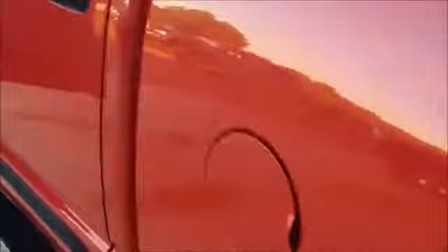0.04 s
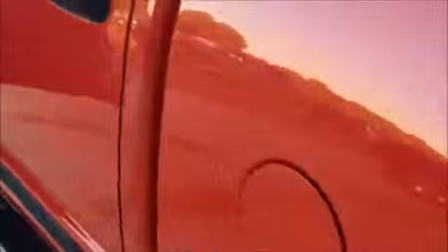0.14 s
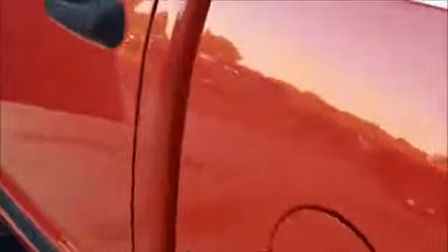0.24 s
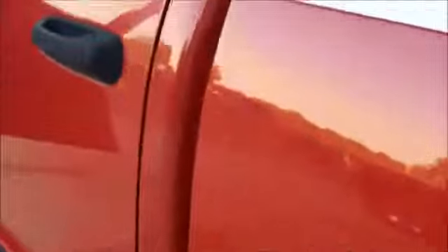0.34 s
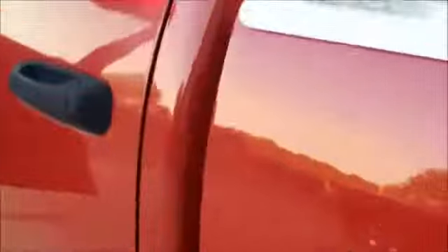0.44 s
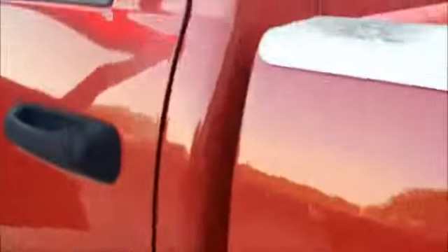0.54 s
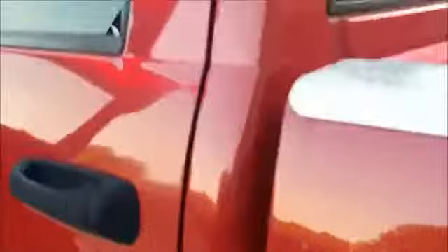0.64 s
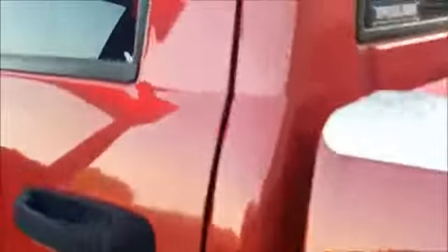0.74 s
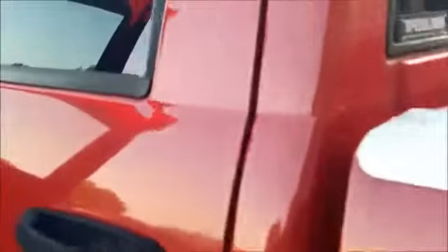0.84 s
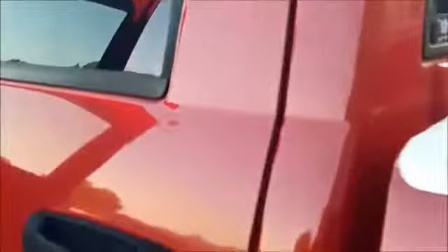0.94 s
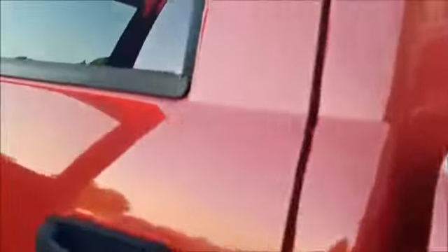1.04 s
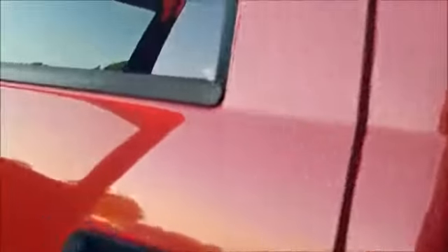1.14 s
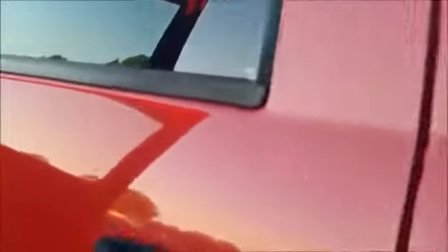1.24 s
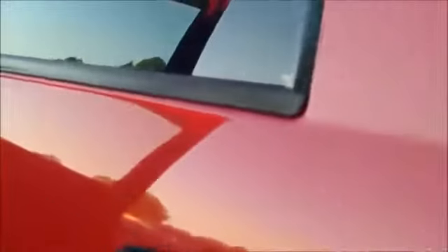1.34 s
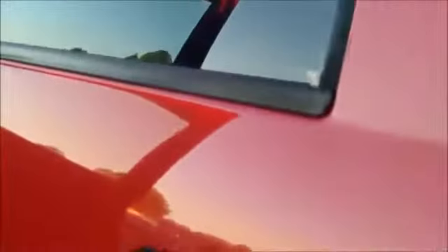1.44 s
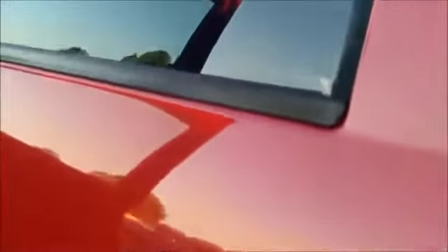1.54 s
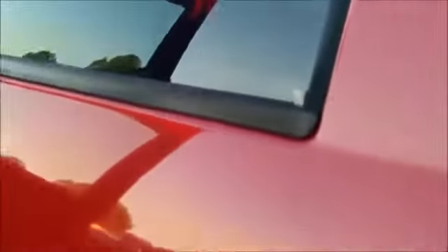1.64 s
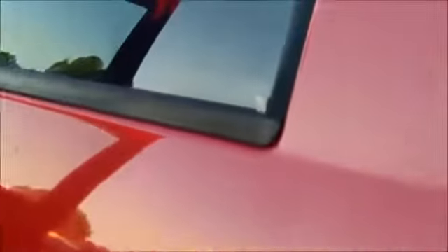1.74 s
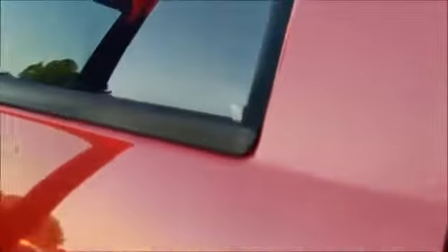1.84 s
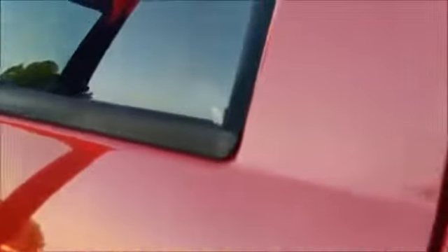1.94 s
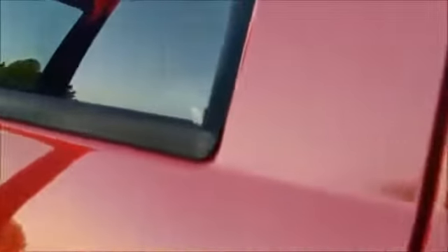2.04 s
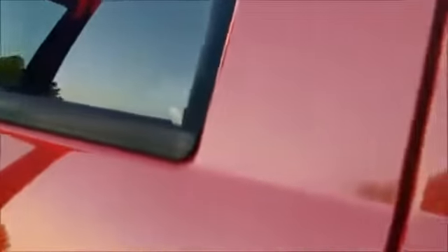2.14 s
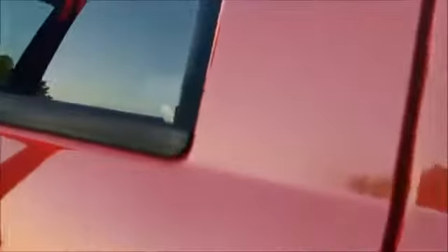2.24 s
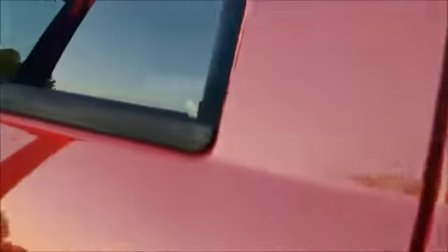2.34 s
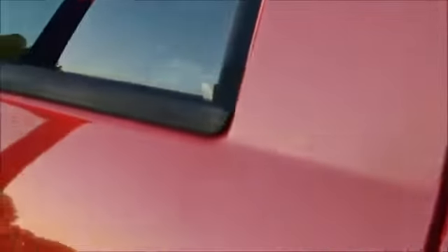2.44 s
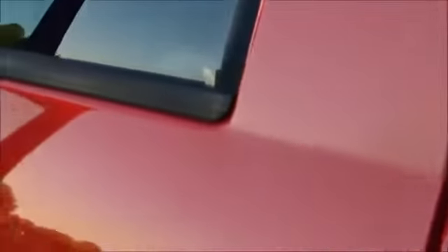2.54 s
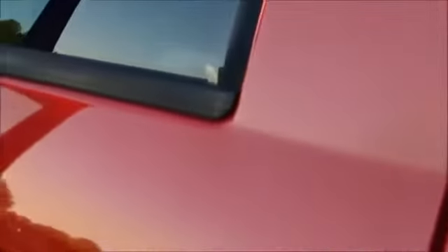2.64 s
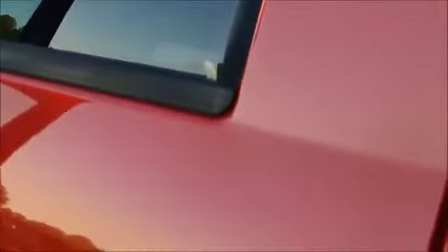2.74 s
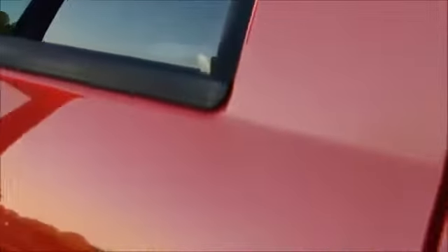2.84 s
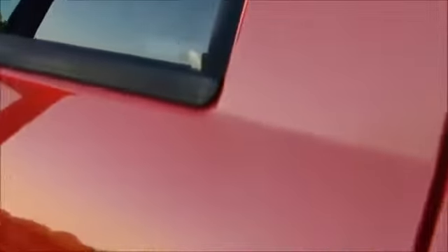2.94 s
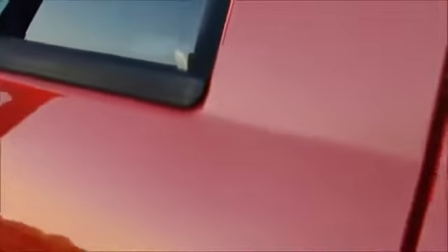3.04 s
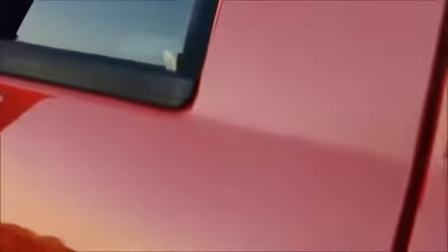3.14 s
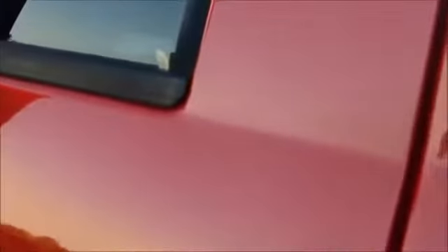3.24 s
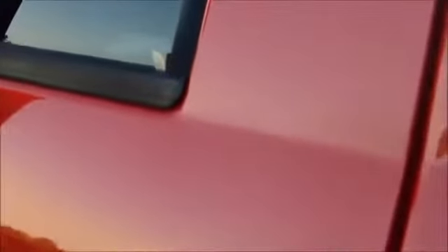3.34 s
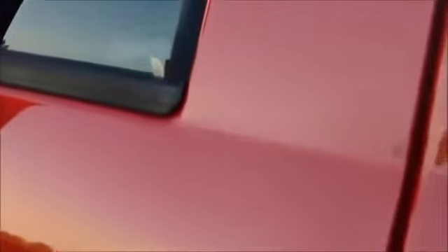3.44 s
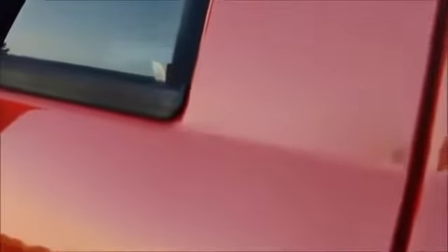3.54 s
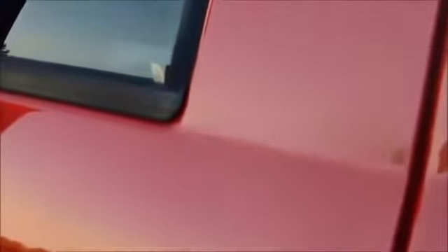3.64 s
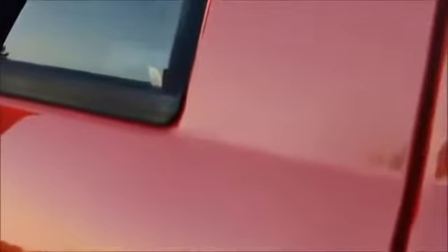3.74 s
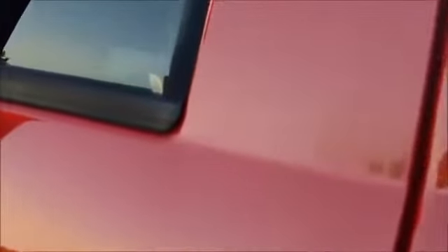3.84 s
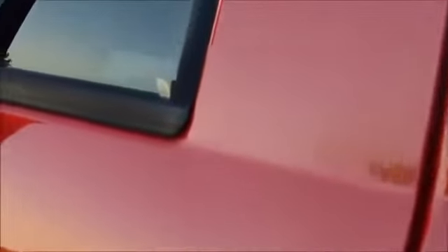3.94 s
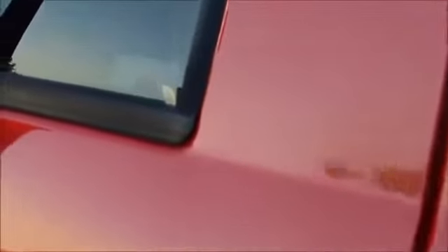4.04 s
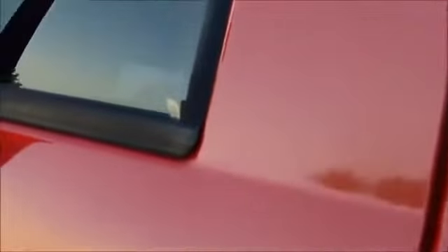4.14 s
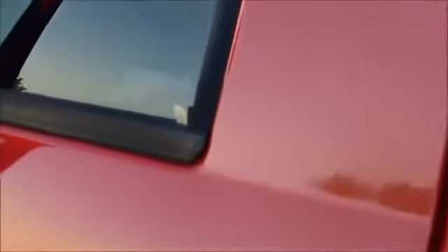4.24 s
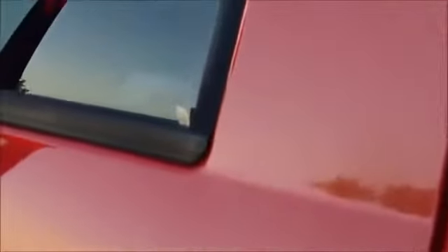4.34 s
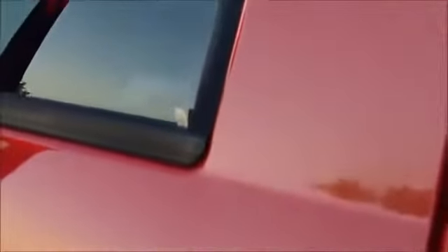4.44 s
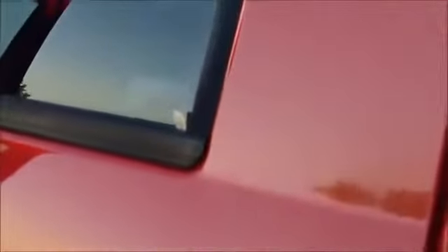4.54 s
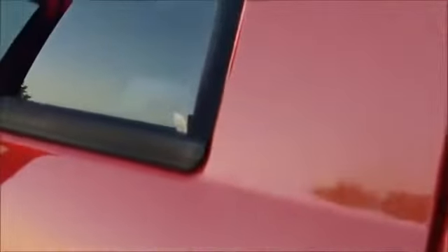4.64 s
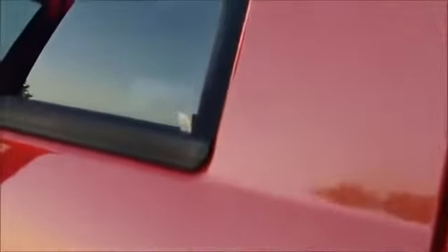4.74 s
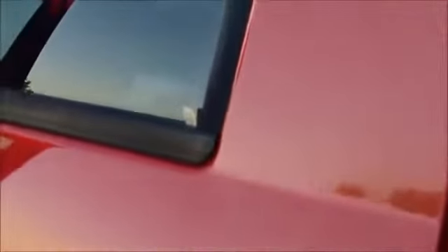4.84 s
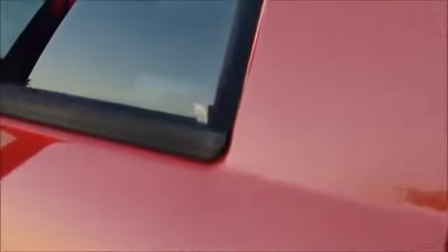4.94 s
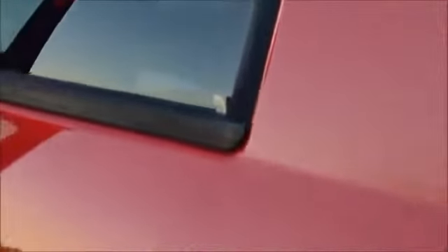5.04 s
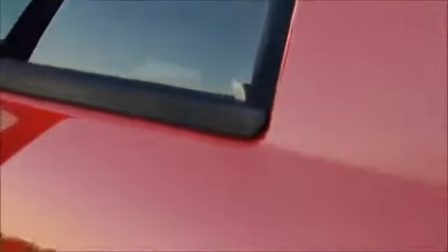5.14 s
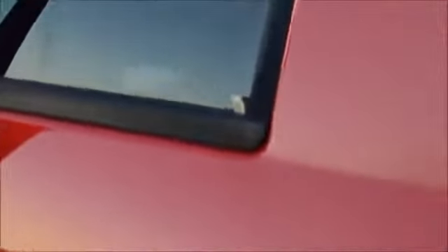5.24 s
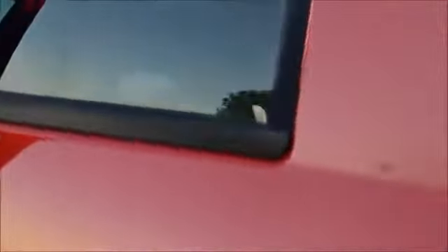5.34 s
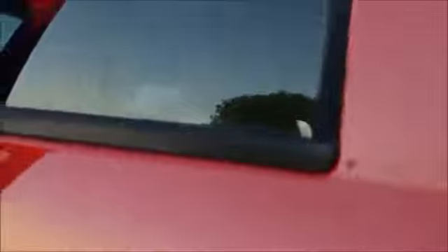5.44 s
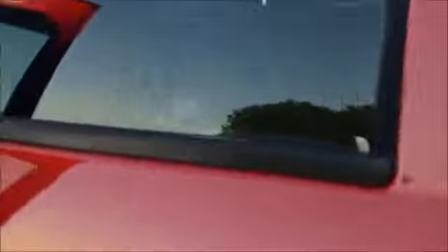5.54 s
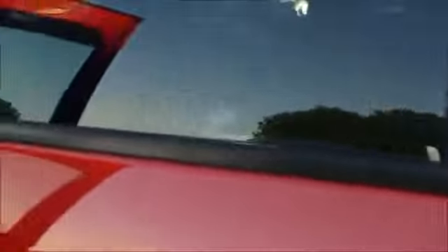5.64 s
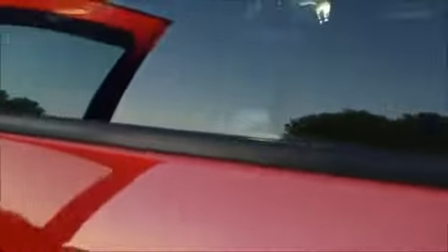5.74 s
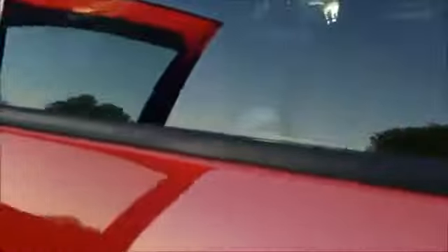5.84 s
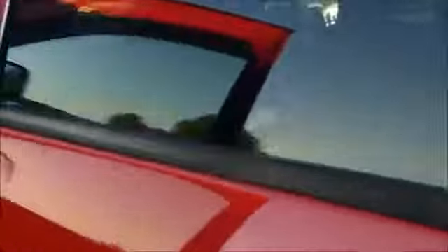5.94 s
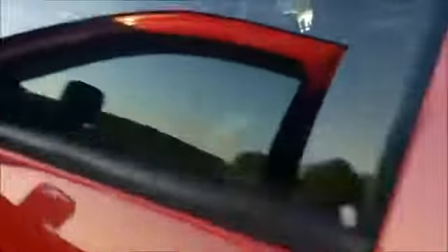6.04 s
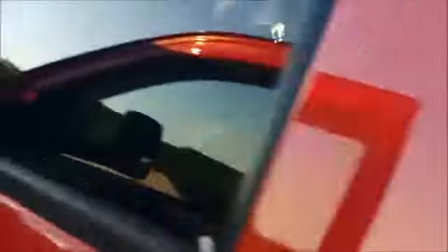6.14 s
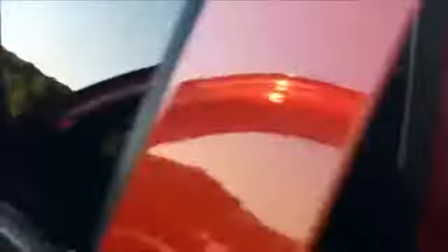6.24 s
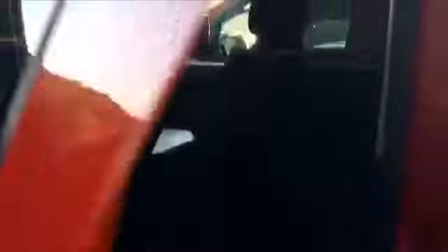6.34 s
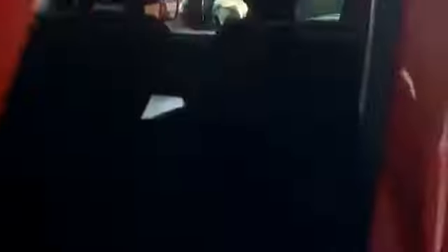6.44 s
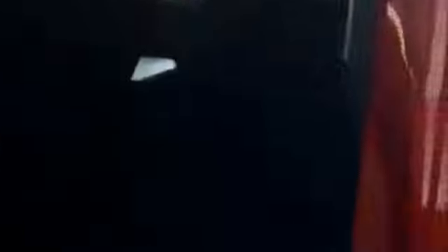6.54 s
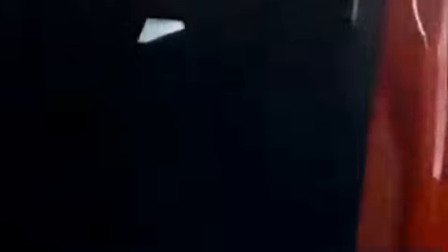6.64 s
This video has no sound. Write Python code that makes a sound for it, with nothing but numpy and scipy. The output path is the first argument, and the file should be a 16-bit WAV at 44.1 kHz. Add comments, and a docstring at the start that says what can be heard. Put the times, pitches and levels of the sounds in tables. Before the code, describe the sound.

Fingers and fabric scrape and click against a small hard case outdoors; later a handle creaks, a door pops, and a second latch cracks loudly.

```python
"""Beside a parked pickup truck on a still evening, a far traffic drone (filtered noise) hums throughout. First
cloth and fingers rub, tick and squeak close to the microphone: hiss with tiny clicks, short bursts ringing in a
hard case, and unsteady tones. Then a handle creaks, again with unsteady tones, the front door pops off its
latch while the hand jolts the case, and swings with rumbling, scuffing noise and a short rattle, and the rear
cab door unlatches with a sharp clack: a push, a noisy crack, ringing steel and the cab's echo."""
import sys
import numpy as np
from scipy import signal
from scipy.fft import rfft, irfft, next_fast_len
from scipy.io import wavfile

SR = 44100
rng = np.random.default_rng(int(sys.argv[2]) if len(sys.argv) > 2 else 0)


def persist_wave(psi):
    """Save psi, clipped to +-1, as 16-bit WAV."""
    counts = np.round(np.clip(psi, -1, 1) * 32767).astype(np.int16)
    wavfile.write(sys.argv[1], SR, np.atleast_2d(counts).T)


N = 295196
TIME = np.arange(N) / SR  # seconds


def from_db(db):
    """Turn decibels into a gain."""
    return 10 ** (np.asarray(db) / 20)


def rms_one(x):
    """Scale a sound so that its average strength (rms) is 1."""
    return x / np.sqrt(np.mean(x ** 2) + 1e-20)


def gains(rows):
    """Draw one gain curve over time for each dB column, practically silent outside the rows."""
    s, *columns = np.transpose(rows)
    return [from_db(np.interp(TIME, s, column, left=-120, right=-120)) for column in columns]


def cut(x, hz, kind, order=2):
    """Filter smoothly: "low" keeps what lies below hz, "high" keeps what lies above."""
    safe_hz = np.clip(hz, 10, .45 * SR)
    return signal.sosfilt(signal.butter(order, safe_hz, kind, fs=SR, output="sos"), x)


def colour(x, spectrum):
    """Shape the tone of x by gains at given frequencies, then scale it to rms 1."""
    hz, db = np.transpose(spectrum)
    size = next_fast_len(N)
    bins = np.maximum(np.fft.rfftfreq(size, 1 / SR), 1)
    bin_db = np.interp(np.log(bins), np.log(hz), db, left=-90, right=-90)
    return rms_one(irfft(rfft(x, size) * from_db(bin_db), size)[:N])


def drift(rate_hz, size=N):
    """Wander at random between rate_hz new values a second, with rms 1."""
    steps = np.arange(size) * rate_hz / SR
    count = int(steps[-1]) + 2
    return rms_one(np.interp(steps, np.arange(count), rng.standard_normal(count)))


def resonate(x, hz, width_hz):
    """Let x ring at one frequency, with a gain of about 1 at the peak."""
    r = np.exp(-np.pi * width_hz / SR)
    feedback = [1, -2 * r * np.cos(2 * np.pi * hz / SR), r * r]
    return signal.lfilter(np.array([1, 0, -1]) * (1 - r * r) / 2, feedback, x)


def add(out, s, sound):
    """Mix a short sound in at time s."""
    at = max(round(s * SR), 0)
    out[at:at + len(sound)] += sound[:max(N - at, 0)]


def burst(decay_s, count=2048):
    """A contact makes tiny random slips that die away quickly."""
    return rng.standard_normal(count) * np.exp(-np.arange(count) / (SR * decay_s))


def at_level(sound, db):
    """Give a short sound the energy of one millisecond at an rms level of db."""
    return sound * from_db(db) / np.sqrt(np.sum(sound ** 2) / (SR / 1000))


def friction(per_s, spread_db, smooth):
    """Rough surfaces catch and let go: random clicks of uneven size over a smooth hiss."""
    sizes = from_db(spread_db * np.minimum(rng.exponential(1, N), 4)) * rng.choice([-1, 1], N)
    clicks = sizes * (rng.random(N) < per_s / SR)
    return rms_one(clicks) + smooth * rng.standard_normal(N)


def patchy(x, depth_db, rate_hz, count=16):
    """The contact keeps changing, so bands of the sound swell and fade each on its own."""
    centres = np.geomspace(300, 12000, count)
    # each band adds only its change from its normal strength
    bands = [resonate(x, hz, hz / 5) * (from_db(depth_db * drift(rate_hz)) - 1) for hz in centres]
    return rms_one(x + np.sum(bands, axis=0))


def shell(x):
    """A small hard case rings at several frequencies side by side."""
    # ringing of the case: [f/Hz, width/Hz, level/dB]
    shell_modes = [(1204, 226, 7), (2400, 450, 5), (2860, 960, 0.5), (4420, 990, 3.5), (5070, 1170, -1.5),
                   (6930, 960, -2), (8940, 1180, -5), (14040, 830, -30)]
    # neighbouring modes have opposite signs
    return sum((-1) ** k * from_db(db) * resonate(x, hz, width)
               for k, (hz, width, db) in enumerate(shell_modes))


def gesture(s, swell_s, hold_s, fade_db_per_s):
    """A movement swells evenly, holds and dies away."""
    swell = np.clip((TIME - s) / max(swell_s, 1 / SR), 0, 1)
    fading_s = np.maximum(TIME - s - swell_s - hold_s, 0)
    return swell * from_db(-np.minimum(fade_db_per_s * fading_s, 200))


def together(envelopes):
    """Overlapping movements add in power."""
    return np.sqrt(sum(e ** 2 for e in envelopes))


def two_layers(rows, fade_db_per_s):
    """Each row drives two layers at their own levels; its length sets its fade through fade_db_per_s."""
    moves = []
    for s, swell_s, hold_s, *dbs in rows:
        shape = gesture(s, swell_s, hold_s, fade_db_per_s(swell_s + hold_s))
        moves.append((shape, from_db(dbs)))
    return [together(shape * gain[k] for shape, gain in moves) for k in range(2)]


def outdoors(air_db=-50, hum_db=-57):
    """Still air is soft shaped noise; far traffic adds a low drone, noise ringing near 136 Hz."""
    # tone of the distant outdoor hum: [f/Hz, relative level/dB]
    air_spectrum = [(12, -21), (20, -0.5), (80, -5), (144, -3), (180, -11.5), (382, -11), (416, -11),
                    (452, -11.5), (788, -15), (1300, -21), (1580, -24.5), (4430, -28.5), (8170, -32.5),
                    (14300, -34.5), (15500, -42)]
    # slow rise and fall of air and drone: [t/s, level/dB]
    air_swell = [(0, 2.5), (1, 3.5), (2, 3), (3.5, 2), (4.6, 1.5), (6.69, 3)]
    swell, = gains(air_swell)
    drone = rms_one(resonate(rng.standard_normal(N), 135.6, 30))
    air = colour(rng.standard_normal(N), air_spectrum)
    return swell * (from_db(air_db) * air + from_db(hum_db) * drone)


def sliding(fade_db_per_s=229):
    """How hard the cloth slides at each moment, as a gain for its hiss."""
    # strokes of cloth past the case: [start t/s, swell/s, hold/s, hiss level/dB]
    strokes = [(0.0, 0.03, 0.1, -58), (0.444, 0.0054, 0.044, -46), (0.615, 0.055, 0.022, -50.5),
               (1.086, 0.0054, 0.021, -37), (1.094, .17, 0.15, -30.5), (1.475, 0.035, 0.17, -49.5),
               (1.686, 0.014, 0.044, -38), (1.74, 0.015, 0.031, -46.5), (2.1, 0.037, 0.079, -47.5),
               (2.205, 0.031, 0.012, -31), (2.254, 0.083, 0.21, -32.5), (2.576, 0.016, 0.22, -44.5),
               (2.753, .06, 0.033, -31.5), (2.882, 0.092, 0.12, -42.5), (3.107, 0.018, 0.16, -49),
               (3.326, 0.045, 0.042, -51.5), (3.776, 0.088, 0.19, -47), (4.195, 0.066, 0.089, -54.5)]
    return together(from_db(db) * gesture(s, swell_s, hold_s, fade_db_per_s)
                    for s, swell_s, hold_s, db in strokes)


def rubbing(hiss, flutter_db=1.9, catch_db=-9, fade_db=9.5):
    """Cloth hisses and catches, the case rumbles; a pressing, shifting hand makes low thumps."""
    # the hand presses and shifts on the case; at the last two rows it jolts the case as the doors open: #
    # [start t/s, swell/s, hold/s, rumble level/dB, low thump level/dB]
    pushes = [(0.007, 0.0017, .005, -41, -60), (0.444, 0.0031, 0.046, -39.5, -46),
              (1.088, 0.0057, 0.027, -37.5, -39.5), (1.2, 0.042, .01, -37, -49),
              (1.35, 0.021, 0.089, -29.5, -53), (1.685, 0.0026, 0.01, -30.5, -48),
              (2.342, .006, .01, -29, -44), (2.36, .025, 0.052, -30, -26.5),
              (2.55, 0.057, 0.075, -49.5, -45), (2.81, 0.02, 0.023, -40, -55),
              (2.95, 0.045, 0.073, -47.5, -60), (5.89, .01, 0.084, -41, -31.5),
              (6.266, .008, 0.042, -57, -37)]
    # tone of the cloth fibres: [f/Hz, relative level/dB]
    cloth_spectrum = [(290, -21), (500, -45), (628, -10.5), (1080, 2.5), (1300, -22), (1430, -9.5),
                      (1830, -2), (2230, 2.5), (3720, 3), (7470, -6.5), (8130, -3), (9380, -8.5),
                      (15000, -23)]
    # tone of the rumble: [f/Hz, relative level/dB]
    rumble_spectrum = [(70, -10), (120, -4.5), (170, -0.5), (270, 0), (330, 1), (460, -2), (700, -6.5),
                       (900, -6.5), (1200, -10), (1700, -14), (2600, -22)]
    # tone of the low thumps: [f/Hz, relative level/dB]
    thump_spectrum = [(25, -15), (55, 2), (85, -7.5), (118, 8), (170, -6), (260, -3), (380, -10),
                      (520, -27), (800, -29)]
    # fade_db is lost in each span as long as the push itself: slow pushes let go slowly
    rumble_gain, thump_gain = two_layers(pushes, lambda length_s: fade_db / length_s)
    grip = from_db(flutter_db * drift(90))
    fibres = colour(friction(per_s=5000, spread_db=3.5, smooth=1.0), cloth_spectrum)
    fibres = patchy(fibres, depth_db=3.5, rate_hz=45)
    uneven = rng.standard_normal(N) * from_db(11 * np.minimum(drift(260), 2.2))
    catches = rms_one(shell(cut(uneven, 1800, "high", order=1)))
    rumble = colour(friction(per_s=1500, spread_db=3.0, smooth=1.0), rumble_spectrum)
    rumble = patchy(rumble, depth_db=2.5, rate_hz=34)
    thump = colour(rng.standard_normal(N), thump_spectrum)
    cloth = rms_one(fibres + from_db(catch_db) * catches)
    return grip * (hiss * cloth + rumble_gain * rumble + thump_gain * thump)


def faint_ticks(hiss, count=300):
    """Small snags come at random, thicker and stronger while the cloth slides; rows like those in ticks."""
    per_s, level_db, spread_db = 30, -28.5, 2.5  # rate and level under a stroke of full_stroke_db
    full_stroke_db, resting_hand_db = -30.5, -68
    follow = .5  # share of the stroke's swing in dB that the snags follow
    centre_hz, spread_octaves, decay_s = 2940, 0.53, 0.0011
    when, chance = rng.random((count, 2)).T  # when: share of the whole length
    size, pitch = np.clip(rng.standard_normal((count, 2)), -2, 2).T
    stroke_db = 20 * np.log10(hiss[(when * N).astype(int)] + from_db(resting_hand_db))
    effort_db = follow * (stroke_db - full_stroke_db)
    db = level_db + effort_db + spread_db * size
    hz = centre_hz * 2 ** (spread_octaves * pitch)
    rows = np.transpose([when * N / SR, db, hz, np.full(count, decay_s)])
    # keep each candidate with the chance that gives the wanted rate
    return list(rows[chance < per_s * from_db(effort_db) * N / SR / count])


def ticks(hiss, width_share=0.81, direct_db=-12, rise_s=0.00031, edge_db=-25):
    """Each snag is a dull or bright burst that rings in the shell; brighter ones have a sharper edge."""
    # the clearest snags and small contacts: [t/s, level/dB, centre f/Hz, decay time/s]
    clear_ticks = [(0.113, -34.5, 1400, .007), (0.354, -41, 6450, 0.0033), (0.447, -31, 2980, 0.0076),
                   (0.499, -30.5, 3520, .007), (1.043, -34.5, 2510, 0.00033), (1.0889, -17.5, 2320, .002),
                   (1.098, -19.5, 2780, 0.011), (1.244, -26.5, 1960, 0.0033), (1.2876, -20.5, 4810, .0012),
                   (1.428, -18, 3640, 0.0011), (1.436, -14, 4100, 0.0028), (1.543, -18.5, 5000, 0.0078),
                   (1.757, -17.5, 4970, .002), (1.811, -21.5, 4040, 0.00096), (2.16, -28, 3390, 0.0011),
                   (2.3455, -9, 4600, 0.0031), (2.3627, -10, 4240, 0.0033), (2.4775, -13, 3930, .001),
                   (2.51, -11, 2730, 0.000093), (2.525, -17, 3720, .0014), (2.538, -17, 4140, 0.00066),
                   (2.621, -29.5, 1410, .003), (2.675, -12.5, 3770, 0.0024), (2.835, -13.5, 3580, 0.00057),
                   (2.865, -21, 3890, 0.0018), (2.895, -21.5, 3850, 0.0019), (3.031, -20, 3720, .0006),
                   (3.137, -27, 2740, 0.0023), (3.96, -29, 4050, 0.0015), (4.119, -31, 8100, 0.0096),
                   (4.218, -30.5, 4960, 0.00094), (4.271, -25, 3580, 0.00029), (4.274, -23.5, 3800, 0.0016),
                   (4.291, -31, 8500, .003), (4.328, -34, 6500, .0015), (4.348, -21, 2030, 0.0021),
                   (5.037, -40, 940, 0.0033), (5.098, -39, 2370, 0.0039), (5.144, -42.5, 2470, 0.0021),
                   (6.402, -32, 1100, 0.01)]
    out = np.zeros(N)
    for s, db, hz, decay_s in list(clear_ticks) + faint_ticks(hiss):
        slip = burst(decay_s)
        rise = 1 - np.exp(-np.arange(len(slip)) / (SR * rise_s))
        snag = resonate(slip * rise, hz, width_share * hz)
        direct = from_db(direct_db) * cut(snag, 2.54 * hz, "low")
        edge = from_db(edge_db) * (hz / 4000) ** 2 * resonate(slip, 8000, 1200)
        add(out, s, at_level(shell(snag) + direct + edge, db))
    return out


def squeaks_and_rattle(overtone_db=-15, upper_ratio=2.26, rasp_db=-4.5):
    """Squeaks of skin or handle and one door rattle: two partials at unsteady pitch with a broad rasp."""
    # squeaks of skin or handle, and at 6.012 s a short rough rattle of the door:
    # [t/s, length/s, pitch f/Hz, level/dB, upper partial relative level/dB, pitch jitter/share]
    squeak_rows = [(1.686, 0.055, 849.4, -31, 6.5, 0.093), (2.227, .016, 1880, -45, -20, 0.095),
                   (2.923, 0.035, 1340, -45.5, -17, 0.089), (3.046, 0.02, 4100, -36, -12, .05),
                   (5.696, .034, 950, -28, -15, 0.036), (5.729, 0.027, 1480, -43, -8, .03),
                   (6.012, .013, 832, -23.5, -8, .1)]
    out = np.zeros(N)
    for s, length_s, pitch_hz, level_db, upper_db, jitter in squeak_rows:
        size = int(length_s * SR)
        for hz, db in (pitch_hz, level_db), (upper_ratio * pitch_hz, level_db + upper_db):
            phase = 2 * np.pi * np.cumsum(hz * (1 + jitter * drift(925.0, size))) / SR
            tone = np.sqrt(2) * (np.sin(phase) + from_db(overtone_db) * np.sin(2 * phase))
            rasp = resonate(rng.standard_normal(size), hz, .65 * hz)
            rasp = rms_one(cut(rasp, 2.2 * hz, "low"))
            swell = np.abs(np.sin(np.linspace(0, np.pi, size))) ** 0.48
            swell = swell * from_db(0.58 * drift(290, size))
            add(out, s, from_db(db) * swell * (tone + from_db(rasp_db) * rasp))
    return out


def swing(boom_db=-3, judder_db=1.5, fade_db_per_s=180):
    """Handled doors judder, boom at four panel tones and scuff; the same noise makes a latch crack's tail."""
    # the doors are touched, pulled and swung; the 6.265 s row is the latch crack's noisy tail in the cab:
    # [start t/s, swell/s, hold/s, rumble level/dB, scuff level/dB]
    pulls = [(4.95, 0.083, 0.22, -59.5, -59.5), (5.302, 0.0036, 0.012, -40, -43.5),
             (5.69, 0.0035, 0.026, -42.5, -35), (5.848, 0.0049, 0.01, -26.5, -37.5),
             (5.886, 0.0026, 0.044, -23, -32.5), (5.98, .02, 0.027, -32, -44),
             (6.08, 0.073, 0.066, -31, -46.5), (6.265, 0.0043, 0.0047, -24, -44.5),
             (6.28, 0.016, 0.049, -25, -67)]
    # tone of the shaken door panel: [f/Hz, relative level/dB]
    panel_spectrum = [(15, -35), (25, -2), (108, -12), (162, -9), (196, 1), (350, 0.5), (417, -9),
                      (525, -5), (787, -19), (918, -12), (1050, -22), (1380, -36.5), (1670, -33),
                      (1800, -46), (2500, -40), (3250, -59.5), (5500, -120)]
    # tone of the scuffing noise: [f/Hz, relative level/dB]
    scuff_spectrum = [(710, 5.5), (1200, -0.5), (1370, -3), (1630, -2.5), (2970, -7.5), (4090, -7.5),
                      (8060, -24), (13000, -36)]
    rumble_gain, scuff_gain = two_layers(pulls, lambda length_s: fade_db_per_s)
    shake = colour(friction(per_s=640, spread_db=5.0, smooth=1.0), panel_spectrum)
    shake = shake * from_db(judder_db * drift(110))
    panel_tones = (174, 55), (399, 26), (633, 35), (883, 30)  # (Hz, width Hz)
    boom = rms_one(sum(resonate(shake, hz, width_hz) for hz, width_hz in panel_tones))
    scuff = colour(friction(per_s=2500, spread_db=2.5, smooth=0.46), scuff_spectrum)
    scuff = patchy(scuff, depth_db=2.5, rate_hz=72)
    return rumble_gain * rms_one(shake + from_db(boom_db) * boom) + scuff_gain * scuff


def blows(gap_s=.004, thud_change_db=0.5, metal_change_db=-10, dulling=0.45):
    """Give every knock and its rebounds, whose thud is duller and whose metal is softer."""
    # blows on the doors: [t/s, thud level/dB, thud low edge f/Hz, thud high edge f/Hz, crack level/dB,
    # ring level/dB, number of rebounds]
    knocks = [(5.876, -15.5, 220, 504, -41, -37, 0), (5.8879, 5.5, 35, 314, -28, -29, 0),
              (6.016, -13.5, 220, 700, -43, -27.5, 0), (6.2627, -22, 500, 1460, -17.5, -7, 0),
              (6.2646, -2, 172, 990, -11, -4, 2), (6.527, -36, 180, 398, -61, -60, 0)]
    for s, thud_db, low_hz, high_hz, crack_db, ring_db, rebounds in knocks:
        yield s, thud_db, low_hz, high_hz, crack_db, ring_db
        for k in range(round(rebounds)):
            yield (s + (k + 1) * gap_s, thud_db + thud_change_db, low_hz, dulling * high_hz,
                   crack_db + metal_change_db, ring_db + metal_change_db)


def door_ring(count=22050):
    """Door steel and trim ring as fading tones, each struck a little differently on every blow."""
    # ringing of door steel and trim: [f/Hz, relative level/dB, t60 (time to fade by 60 dB)/s]
    door_modes = [(131.7, -10.5, 0.25), (184, 2.5, 0.11), (219, -11.5, 0.27), (326, 0, 0.16),
                  (397, -20, 0.41), (420, -7, 0.051), (549, -13.5, 0.11), (640, -10, 0.12),
                  (810, -12.5, 0.18), (893, -3.5, 0.075), (1102, -16.5, 0.12), (1190, -7, 0.082),
                  (1360, -37, 0.11), (1870, -6, 0.056), (2310, -24, 0.086), (3080, -23, 0.055)]
    t = np.arange(count) / SR
    hz, db, t60 = np.transpose(door_modes)[:, :, None]
    sign = (-1) ** np.arange(len(door_modes))[:, None]
    strength = from_db(db + 1.14 * rng.standard_normal(db.shape)) * sign
    return np.sum(strength * from_db(-60 * t / t60) * np.sin(2 * np.pi * hz * t), axis=0)


def latches(echo_db=-12, echo_t60=0.28, drum_hz=180, drum_width_hz=22, drum_db=15, count=22050):
    """A blow is a push that drums the door skin, a crack of the latch, ringing steel and the cab's echo."""
    # tone of the cab echo: [f/Hz, relative level/dB]
    cab_spectrum = [(100, -14.5), (200, 4), (400, 7), (700, -2.5), (1200, -23), (1600, -14), (2200, -31),
                    (4000, -43), (9000, -49)]
    out, t = np.zeros(N), np.arange(count) / SR
    cab = colour(rng.standard_normal(N), cab_spectrum)
    for k, (s, thud_db, low_hz, high_hz, crack_db, ring_db) in enumerate(blows()):
        push = cut(cut(signal.unit_impulse(count), high_hz, "low"), low_hz, "high")
        thud = push + from_db(drum_db) * resonate(push, drum_hz, drum_width_hz)
        crack = cut(burst(0.0026, count), 600, "high")  # decay time 2.6 ms
        crack = cut(cut(crack, 1540, "low", order=1), 9900, "low", order=4)
        # each blow takes another stretch of the noise, which builds up quickly and fades
        echo = np.roll(cab, k * count)[:count] * from_db(-60 * t / echo_t60) * (1 - np.exp(-t / .004))
        ring = cut(door_ring() + from_db(echo_db) * echo, 216, "high")
        add(out, s, at_level(thud, thud_db) + at_level(crack, crack_db))
        add(out, s, from_db(ring_db) * ring)
    return out


def scene():
    """Mix the outdoor hum, the cloth and hand sounds and the doors into one channel."""
    hiss = sliding()
    close_sounds = rubbing(hiss) + squeaks_and_rattle() + ticks(hiss)
    return (outdoors() + close_sounds + swing() + latches())[None]


def gain_control(x, threshold_db=-5, release_db_per_s=45, attack_hz=90):
    """Loud peaks pull the gain down; it creeps back afterwards."""
    over_db = np.maximum(20 * np.log10(np.abs(x) + 1e-9) - threshold_db, 0)
    release_db = release_db_per_s * TIME
    held_db = np.maximum.accumulate(over_db + release_db, axis=-1) - release_db
    return x * from_db(-cut(held_db, attack_hz, "low", order=1))


def record(dry, cutoff_hz=15200):
    """Apply gain control, a narrow notch in the treble, overload and a steep top cut."""
    x = gain_control(dry)
    x = x - resonate(x, 8090, 450)
    overloaded = np.clip(x, -1, 1)
    return signal.sosfilt(signal.ellip(10, .1, 80, cutoff_hz, fs=SR, output="sos"), overloaded)


dry = scene()
out = record(dry)
persist_wave(out)
```